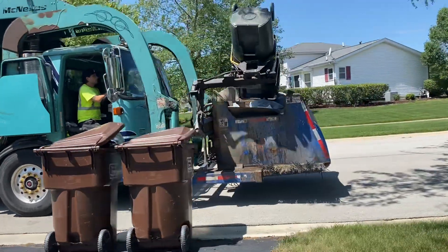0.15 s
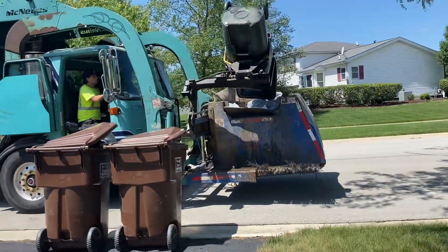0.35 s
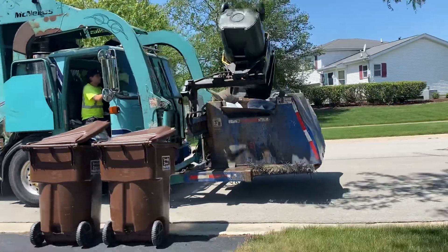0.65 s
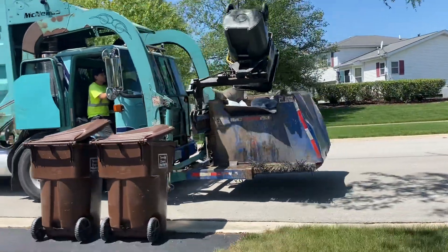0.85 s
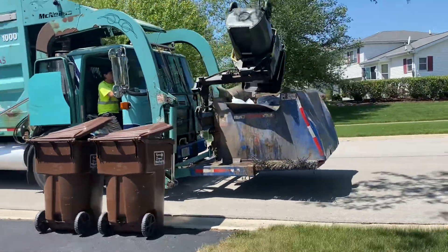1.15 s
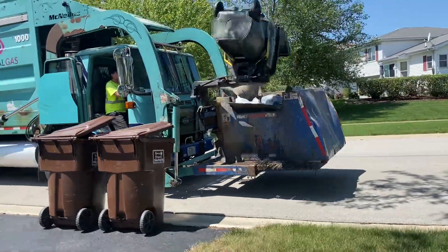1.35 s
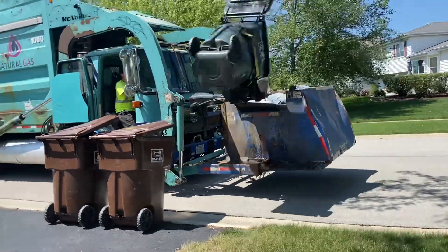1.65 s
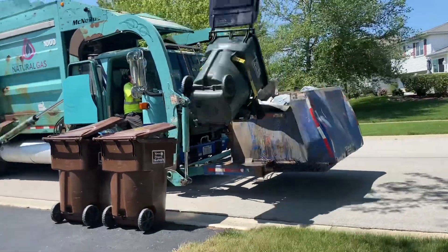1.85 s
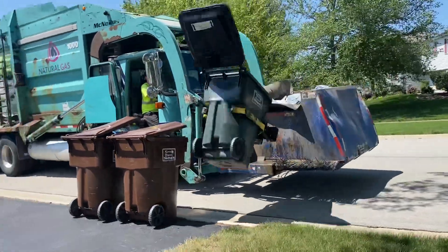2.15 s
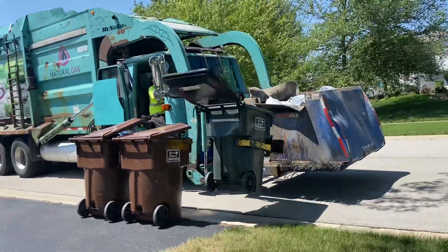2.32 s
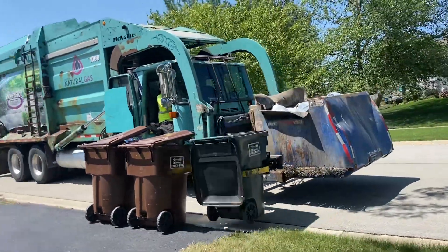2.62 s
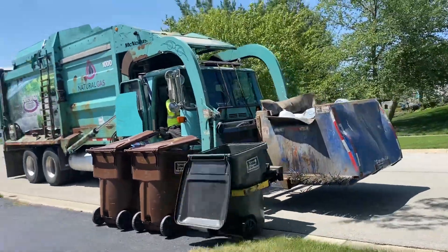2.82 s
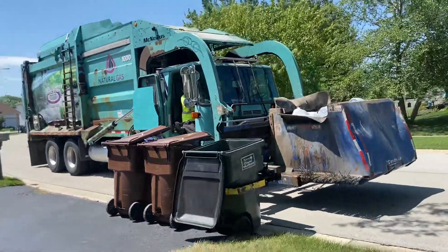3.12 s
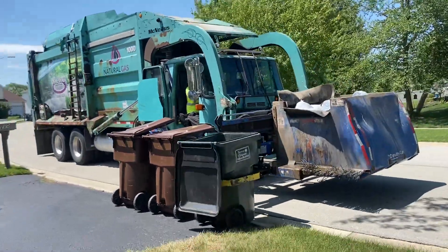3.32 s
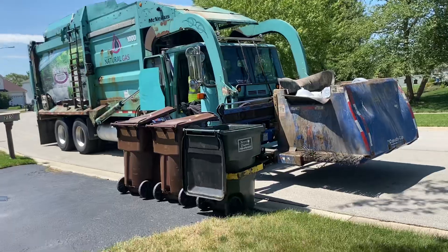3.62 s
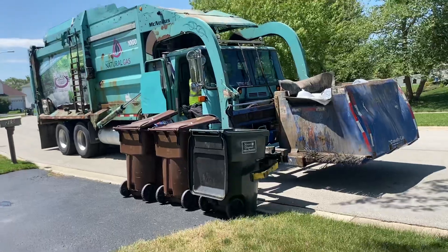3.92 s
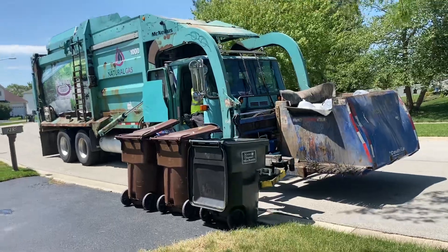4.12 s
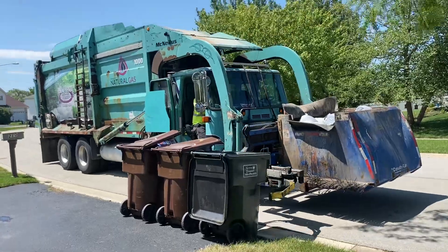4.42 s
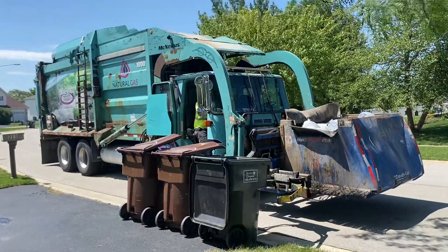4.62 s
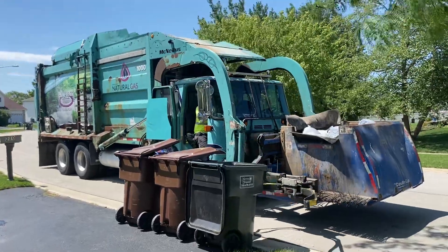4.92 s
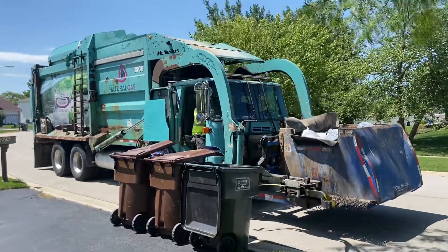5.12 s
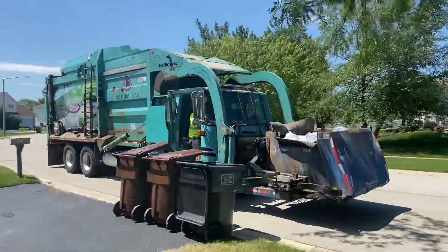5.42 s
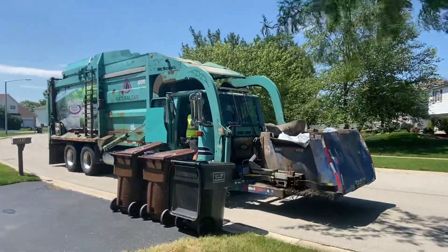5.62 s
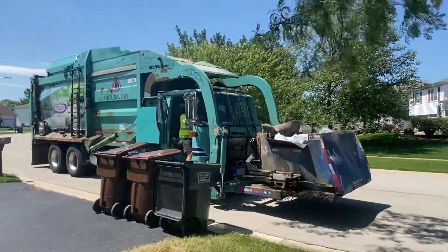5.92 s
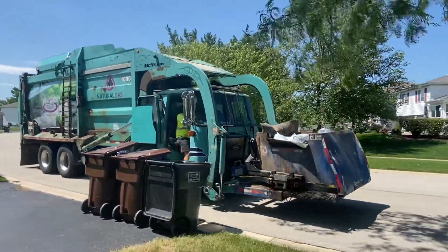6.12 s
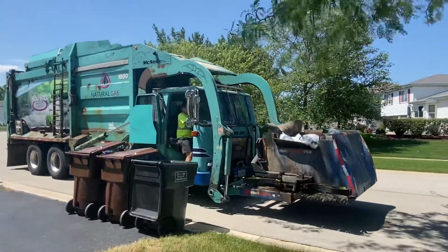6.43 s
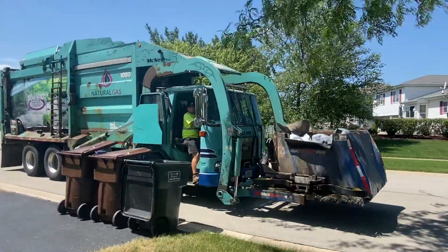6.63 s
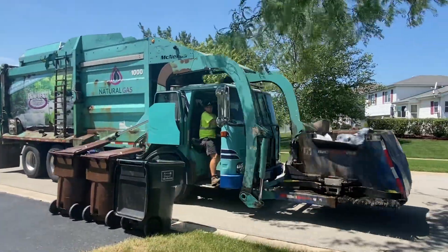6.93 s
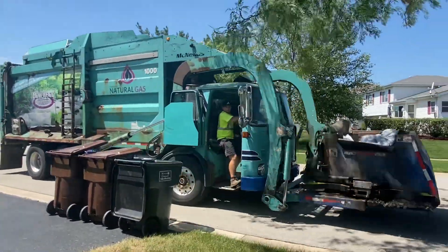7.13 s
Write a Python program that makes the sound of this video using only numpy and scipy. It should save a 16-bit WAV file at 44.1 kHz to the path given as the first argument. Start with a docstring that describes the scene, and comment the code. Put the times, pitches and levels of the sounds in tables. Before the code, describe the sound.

Outdoors, near the kerb, a microphone catches a large truck's uneven, rumbling idle. Isolated hard bangs of a plastic bin are followed by a dense run of lid slaps, thuds, metal ticks and hopper booms as it is emptied and put down. Low wind buffets follow, with a short air bleed and small hydraulic whine. Metal clanks, then the six-cylinder engine climbs in pitch and loudness, hissing and whistling as the truck pulls off.

```python
"""A plastic cart bangs over the idle of a refuse truck, whose arm shakes it out over a steel hopper.
Blows are noise bursts with damped modes, booms are low modes, and house fronts return diffuse echoes.
The arm sets the cart down and folds away while wind buffets the microphone in short low throbs.
The brake clanks off; the six-cylinder engine, tones and noise in step with its firings, revs up,
its turbocharger whistling as a gliding sine."""
import sys
import numpy as np
from scipy import signal
from scipy.fft import rfft, irfft, next_fast_len
from scipy.io import wavfile
from scipy.ndimage import map_coordinates

SR = 44100
rng = np.random.default_rng(int(sys.argv[2]) if len(sys.argv) > 2 else 0)


def bounce(signal):
    """Save signal as a 16-bit WAV file at the path given by the first command-line argument."""
    frames = np.transpose(np.atleast_2d(signal))
    limited = np.clip(frames, -1, 1)
    pcm = np.round(limited * 32767).astype(np.int16)
    wavfile.write(sys.argv[1], SR, pcm)


N = 320155
IDLE_RATE = 40  # reference speed, firings per s

# colour of loose metallic clatter: f/Hz, relative density/dB
CLATTER_COLOUR = [(1100, -38), (1500, 2), (2200, 1), (3000, -2), (4200, -8), (5000, -12), (5700, -7.5),
                  (8000, -16)]
# stereo image: t/s, share out of phase, share wide
IMAGE_SHARES = [(4.89, 0.03, 0.03), (4.91, 0.99, 0.01), (5.03, 0.86, 0.033), (5.2, 0.73, 0.22),
                (5.6, 0.22, 0.9), (6, 0.018, 0.87)]


def amp(db):
    """Level in decibels to amplitude ratio."""
    return 10 ** (np.asarray(db) / 20)


def unit(x):
    """Normalization to a root mean square of 1."""
    return x / np.sqrt(np.mean(x ** 2) + 1e-20)


def along(points, hz):
    """Interpolation of (f/Hz, value) points on a logarithmic frequency axis."""
    f, v = np.transpose(points)
    return np.interp(np.log(hz + 1), np.log(f + 1), v)


def curves(rows):
    """Linear interpolation in time: one value per sample for each column after t/s."""
    s, *cols = np.transpose(rows)
    return [np.interp(np.arange(N) / SR, s, c) for c in cols]


def wobble(rate):
    """Slow random modulation: a smooth curve through `rate` random knots per second."""
    knots = rng.standard_normal(int(N * rate / SR) + 4)
    return map_coordinates(knots, [np.arange(N) * rate / SR])


def filtered(x, response):
    """Linear filtering: the spectrum of x times a response of frequency."""
    m = next_fast_len(x.shape[-1] + 8192)
    return irfft(rfft(x, m) * response(np.fft.rfftfreq(m, 1 / SR)), m)[..., :x.shape[-1]]


def noise(spectrum, gate=1):
    """Coloured noise of rms 1, amplitude-modulated by the gate before filtering."""
    return unit(filtered(gate * rng.standard_normal(N), lambda hz: amp(along(spectrum, hz))))


def add(track, s, sound):
    """Superposition of a sound on the track from time s."""
    part = track[round(s * SR):][:len(sound)]
    part += sound[:len(part)]


def decay(t, t60):
    """Exponential damping: 60 dB lost in t60 seconds."""
    return amp(-60 * t / t60)


def onset(t, rise_s):
    """Exponential build-up with time constant rise_s."""
    return 1 - np.exp(-t / rise_s)


def lowpass(x, corner_hz):
    """Zero-phase second-order low-pass, halving the amplitude at the corner."""
    return filtered(x, lambda hz: 1 / (1 + (hz / corner_hz) ** 2))


def ring(modes, t, attack, scatter_db=4.0, detune=0):
    """Modal synthesis: damped sines at random strengths, detuned at random if asked."""
    tones = 0
    for hz, db, t60 in modes:
        strength = amp(db + rng.normal(0, scatter_db) - 60 * t / t60)
        tones = tones + strength * np.sin(2 * np.pi * hz * (1 + detune * rng.normal()) * t)
    return tones * onset(t, attack)


def wind():
    """Turbulent pressure: low throbs alike at both ports, rougher noise opposite in sign."""
    # buffets: t/s, level/dB, f/Hz
    buffets = [(3.811, -11.5, 95.5), (3.859, -19, 103.5), (3.917, -11, 59.4), (4.021, -13.5, 77.4),
               (4.09, -13, 74), (4.208, -11.5, 72.4), (4.344, -20, 84.6), (4.47, -14, 77.7),
               (4.545, -16.5, 98.3), (4.622, -19.5, 68.5), (4.988, -20, 95)]
    # rough wind noise: t/s, level/dB
    gust = [(3.3, -73), (3.6, -45), (4.0, -34), (4.2, -20.5), (4.35, -37), (4.6, -26), (4.8, -37.5),
            (5.15, -37), (5.6, -59)]
    swell_s = 0.016  # a buffet's envelope peaks after this long
    throbs, t = np.zeros(N), np.arange(SR // 5) / SR
    swell = t / swell_s * np.exp(1 - t / swell_s)
    for s, db, hz in buffets:
        throb = np.sin(2 * np.pi * hz * t + rng.uniform(0, 2 * np.pi))
        add(throbs, s - .008, amp(db) * swell * throb)
    gust_level = amp(curves(gust)[0] + 0.56 * wobble(22.3))
    rough = gust_level * noise([(40, 10), (150, 13), (400, -5.5), (900, -13.0), (2000, -69)])
    return np.array([throbs + rough, throbs - rough])


def houses(x):
    """Diffuse reverberation: a delayed noise tail in which each frequency decays at its own rate."""
    # reverberation time of the street: f/Hz, t60/s
    street_t60 = [(200, 0.56), (2000, 0.18), (10000, 0.38)]
    hz, t, z = signal.stft(rng.standard_normal(SR // 2), SR, nperseg=256)
    tail = signal.istft(z * decay(t, along(street_t60, hz)[:, None]), SR, nperseg=256)[1]
    delayed = np.pad(x, (1500, 0))  # samples
    return signal.fftconvolve(delayed, tail / np.linalg.norm(tail))[:N]


def firing_tones(rate, low_end_db, count):
    """Harmonics of the firing rate: pipe resonance shapes the 1st and 3rd, the 2nd fades with speed."""
    # exhaust pipe, for the 1st and 3rd multiple where they fall: f/Hz, level/dB before low-end strength
    pipe = [(40, -39.5), (53, -48), (60, -24.5), (66, -29), (75, -14.5), (84, -19.5), (88, -21), (92, -39),
            (120, -34.5), (158, -34.5), (170, -21), (198, -27), (212, -17.5), (223, -18.5), (232, -31.5),
            (240, -18.5), (252, -14), (263, -20), (272, -26)]
    # half-multiples from uneven cylinders: multiple of firing rate, level/dB re rms of the 1st
    between = [(3 / 2, -12.5), (5 / 2, -8.5)]
    first_db = along(pipe, rate) + low_end_db
    second_db = -29.5 - 9 * np.log2(rate / IDLE_RATE) + low_end_db  # 9 dB lost as the speed doubles
    third_db = along(pipe, 3 * rate) + low_end_db
    tones = 0
    for multiple, db in enumerate([first_db, second_db, third_db], 1):
        level = np.sqrt(2) * amp(db + 1.05 * wobble(11))
        tones = tones + level * np.sin(2 * np.pi * multiple * count + 0.31 * wobble(8.6))
    for multiple, db in between:
        tones += amp(first_db + db + 2.0 * wobble(9)) * np.sin(2 * np.pi * multiple * count)
    return tones


def crank_knock(rate, clatter_db, count):
    """Impact noise: one burst per crank turn, sinking under the clatter as the speed starts to rise."""
    # colour of the knock: f/Hz, relative density/dB
    knock_colour = [(700, -36), (1200, 7), (1600, 22), (2500, 14.5), (3500, -22), (5000, -24)]
    turn = count / 3  # three firings per crank turn
    phase = turn % 1
    strength = amp(rng.normal(0, 1.8, 400)[turn.astype(int)])
    beat = strength * np.exp(-4 * phase) * onset(phase, 1 / 12)
    under_clatter_db = 2.5 + np.clip(rate - 41, 0, 12)
    return amp(clatter_db - under_clatter_db) * noise(knock_colour, beat)


def firing_noise(rate, low_end_db, count):
    """Amplitude-modulated noise: four bands puff at every firing with its cylinder's strength."""
    # strength of each firing in the cycle: level/dB
    cylinders = [-5, -6.5, -6, -4, -8, -4]
    # colours of exhaust rumble, engine block and hiss: f/Hz, relative density/dB
    rumble_colour = [(20, -30), (38, -13.5), (58, 4), (85, 0), (130, 1), (200, -3), (300, -14), (450, -54)]
    block_colour = [(150, -27), (220, 1), (300, 0.5), (450, -5), (700, -8), (1000, -11), (1400, -18),
                    (2000, -73)]
    hiss_colour = [(4500, 10.5), (6000, 13.5), (8500, 11.5), (11000, -2.5), (15000, -5), (17000, -36)]
    # hiss: t/s, level/dB
    hiss_level = [(0, -55), (0.7, -53.5), (1.7, -51.5), (2.9, -39.5), (4.9, -36.5), (5.6, -34), (6.7, -32),
                  (7.26, -31.5)]
    # treble dips briefly, then stays a little lower: t/s, gain/dB
    lull = [(2.69, 0), (2.715, -18), (2.755, -7), (2.765, -4)]
    octaves = np.log2(rate / IDLE_RATE)
    uneven = np.clip(1 - 0.74 * octaves, 0, 1)  # the firings even out with speed
    firing = count.astype(int)
    strength_db = np.array(cylinders)[firing % len(cylinders)]
    strength_db = strength_db + 3.46 * uneven * rng.standard_normal(1000)[firing]

    def level(idle_db, rise_db, share):
        """Level law: rise_db per doubling of speed plus a share of the low-end strength in dB."""
        return idle_db + rise_db * octaves + share * low_end_db

    def puff(floor, fall):
        """Pulse envelope: decays by exp(-fall) over each firing above a steady floor."""
        return floor + amp(strength_db) * np.exp(-fall * (count % 1))

    rumble_db = level(idle_db=-28.5, rise_db=7.9, share=2.12)
    block_db = level(idle_db=-34.5, rise_db=16.17, share=0.86)
    clatter_db = level(idle_db=-48.5, rise_db=23.6, share=0.3)
    rumble = amp(rumble_db + wobble(9)) * noise(rumble_colour, puff(floor=.7, fall=1.5))
    block = amp(block_db + 2.07 * uneven * wobble(11)) * noise(block_colour, puff(floor=0.98, fall=0.28))
    clatter_level = amp(clatter_db + 0.35 * uneven * wobble(5.7))
    clatter = clatter_level * noise(CLATTER_COLOUR, puff(floor=1.0, fall=0.13))
    clatter += crank_knock(rate, clatter_db, count)
    hiss_gain = amp(curves(hiss_level)[0] + 1.64 * wobble(3.09))
    hiss = hiss_gain * noise(hiss_colour, puff(floor=0.76, fall=1.2))
    return rumble + block + amp(curves(lull)[0]) * (clatter + hiss)


def turbocharger():
    """Frequency modulation: a whistle glides upward, its pitch and level fluctuating."""
    # whistle before fluctuation: t/s, f/Hz, level/dB
    whistle = [(6.25, 8800, -75), (6.45, 9500, -52), (6.8, 10920, -48), (7, 11550, -46), (7.26, 12200, -45)]
    hz, db = curves(whistle)
    level = amp(db + 2.5 * wobble(25))
    return level * np.sin(2 * np.pi * np.cumsum(hz + 35 * wobble(100)) / SR)


def pump():
    """Frequency modulation: an unsteady whine swells as the arm folds home."""
    # whine before fluctuation: t/s, f/Hz, level/dB
    whine = [(4.68, 780, -62), (4.82, 855, -45), (5.02, 825, -44), (5.12, 830, -62)]
    hz, db = curves(whine)
    level = amp(db + 2 * wobble(25.08))
    return level * np.sin(2 * np.pi * np.cumsum(hz + 10 * wobble(25)) / SR)


def engine():
    """Periodic excitation: tones and noise share one firing count, the integral of the firing rate."""
    # engine speed: t/s, firing rate/Hz
    speed = [(0, 40.15), (2.4, 40.1), (3.6, 39.8), (4.2, 38.5), (4.75, 39.6), (5.05, 43), (5.32, 52.9),
             (5.48, 55.9), (5.85, 61.5), (6.08, 66.5), (6.25, 71.4), (6.44, 74.8), (6.95, 84.2),
             (7.26, 90.5)]
    # low-end strength of the truck's sound: t/s, level/dB
    low_end = [(0, 3.5), (0.12, 0), (0.55, -0.5), (0.9, -1), (1.7, -1.5), (2.45, 0.5), (3.15, 1.5),
               (3.5, 2), (3.8, 2.5), (4.1, 1.5), (4.75, 0), (4.9, -4.5), (5.07, -5.5), (5.3, -0.5),
               (5.6, 1.5), (6.08, -1), (6.44, 1), (6.95, 1), (7.26, 1.5)]
    (rate,), (low_end_db,) = curves(speed), curves(low_end)
    count = .75 + np.cumsum(rate) / SR  # firings so far
    tones = firing_tones(rate, low_end_db, count)
    return tones + firing_noise(rate, low_end_db, count) + turbocharger() + pump()


def brake():
    """Forced resonance: chatter drives steel modes, which damp as the parts seat with a loose rattle."""
    # modes of the steel parts: f/Hz, level/dB, t60/s
    brake_modes = [(970, -0.5, 0.049), (2080, -6, 0.035), (2187, -10, 0.18), (2800, -10, 0.025),
                   (4220, -16, 0.025), (5270, -7, 0.038)]
    # clanks: t/s, relative level/dB, chatter/s
    clanks = [(5.158, -12, 0.0305), (5.481, -19, 0.01)]
    out, t = np.zeros(N), np.arange(SR // 3) / SR
    for s, db, chatter in clanks:
        shakes = rng.standard_normal(len(t)) + 0.2 * np.sin(2 * np.pi * brake_modes[0][0] * t)
        shakes = shakes * (t < chatter) * np.minimum(t / 0.0035, 1)
        struck = ring(brake_modes, t, attack=0.00034, scatter_db=1.0)
        squeak = signal.fftconvolve(shakes, struck)[:len(t)]
        squeak *= amp(-9 * np.clip((t - chatter) / 0.003, 0, 1))  # the seated parts damp each other
        # the clatter colour moved up in frequency by 1.7
        loose = filtered(rng.standard_normal(len(t)), lambda hz: amp(along(CLATTER_COLOUR, hz / 1.7)))
        fade = amp(-60 * np.clip(t - chatter, 0, 1) / 0.41 - 2.5 * (t > chatter))
        rattle = fade * unit(loose) * np.minimum(t / 0.008, 1)
        add(out, s, amp(db) * (squeak / np.abs(squeak).max() * 2.1 + .16 * rattle))
    return out


def cart_blows():
    """Impact: a noise crack, a slower thud and cart modes; weaker blows start more slowly."""
    # blows of cart, lid and arm: t/s, relative level/dB, brightness/(dB per octave, roughly),
    # gain of higher cart modes/(dB per octave)
    blows = [(0.005, -14.5, -1.5, -2), (0.128, -26, -3.5, 4), (0.371, -11.5, -0.5, 3),
             (0.411, -13, -2.5, -11), (0.43, -24, 2, -6), (1.019, -26, 7, -6), (1.027, -8, -1.5, -6),
             (2.281, -19, -5.5, 5), (2.306, -18.5, -7, 3), (2.334, -17, -7.5, 7), (2.64, -6, -3.5, 4),
             (2.657, -26, 6.5, 9), (2.68, -23, -10, 2), (2.767, -11.5, -8, 6.5), (2.827, -14.5, -4.5, 8),
             (2.873, -19, -2.5, 6), (2.982, -20.5, -3.5, 0), (3.264, -8, 1, 0), (3.278, -6.5, -2, -4),
             (3.309, -12, 1, 1), (3.335, -14.5, -3, -7), (3.374, -10.5, -2.5, 3), (3.403, -11.5, -4.5, -2),
             (3.495, -22, -6, 8), (3.572, -16.5, -5, 0), (3.662, -19, -2, 4), (4.091, -22, -5, -6),
             (4.165, -23.5, 3, -4), (4.887, -21, -11, 1), (5.484, -11.5, -0.5, 11), (5.707, -7.5, 1.5, 0),
             (5.73, -10, -8, -2), (5.957, -15, -36, -5)]
    # colour of a blow before brightness: f/Hz, relative density/dB
    bang_colour = [(200, 3), (300, 0), (450, 0), (700, -4), (1000, -6), (1400, -10.5), (2200, -14.5),
                   (3000, -19.5), (4200, -23), (5800, -22.5), (8000, -26), (11000, -38.5), (15000, -48)]
    # cart modes before tilt and the common damping: f/Hz, level/dB, t60/s
    cart_modes = [(344.5, 4.5, 0.18), (532.4, 3.5, 0.17), (691, 3.5, 0.073), (813, -20, 0.037),
                  (1252, -1.5, 0.081)]
    out, t = np.zeros(N), np.arange(SR // 3) / SR
    for s, db, bright_db, tilt_db in blows:
        def colour(hz):
            """Spectral tilt of the bang, cut below 180 Hz."""
            return amp(along(bang_colour, hz) + bright_db * np.log2(hz / 1000 + 0.89)) * (hz > 180)

        soft = amp(-0.45 * db)  # attack lengthens as the level falls
        burst = unit(filtered(rng.standard_normal(len(t)), colour))
        low = lowpass(burst, 1200)
        crack = (burst - low) * decay(t, t60=0.13) * onset(t, 0.0011 * soft)
        thud = low * onset(t, 0.014) * decay(t, t60=0.17)
        struck = [(hz, level + tilt_db * np.log2(hz / 500), t60) for hz, level, t60 in cart_modes]
        modes = ring(struck, t, attack=0.0042 * soft, detune=0.08) * decay(t, t60=0.14)
        add(out, s - .004, amp(db) * (crack + 1.02 * thud + 0.4 * modes))
    return out


def joint_ticks():
    """Impact of stiff bodies: short steel modes with a click of low-passed noise."""
    # ticks in the arm's joints: t/s, relative level/dB, brightness/dB (per octave for the modes)
    ticks = [(0.362, -20, 4), (0.366, -2, -6.5), (0.377, -9, -9), (0.387, -14, -7), (1.0301, -19, 7),
             (1.041, -24, 6), (2.323, -24, -1), (2.398, -22, -1), (2.638, -14.5, 4), (2.766, -31, 3.5),
             (2.823, -31, 9), (3.2588, -12.5, 6.5), (3.278, -8, -5), (3.3014, -16, -5.5), (3.4286, -27, 1),
             (3.7609, -24, -14), (3.843, -18, -8), (3.853, -29, 10), (3.896, -37, 18), (5.483, -28, 13)]
    # steel modes before brightness: f/Hz, level/dB, t60/s
    steel_modes = [(2250, -3, .02), (1900, -8, .02), (2700, -3, .022), (3260, -2, .022), (4250, -9, .015),
                   (5250, -5, .016), (5900, -8, .014), (6500, -9, .014)]
    out, t = np.zeros(N), np.arange(SR // 3) / SR
    for s, db, bright_db in ticks:
        struck = [(hz, level + bright_db * np.log2(hz / 2250), t60) for hz, level, t60 in steel_modes]
        click = amp(bright_db - 60 * t / 0.023) * lowpass(rng.standard_normal(len(t)), 8000)
        click = click * onset(t, 0.0038)
        modes = ring(struck, t, attack=0.0017, scatter_db=2.4, detune=0.02)
        add(out, s - .002, amp(db) * (modes + 0.84 * click))
    return out


def hopper_booms():
    """Low resonance: a damped mode with a weaker, shorter overtone."""
    # booms: t/s, relative level/dB, f/Hz, t60/s
    booms = [(0.431, -3.5, 82, 0.14), (1.063, -9, 94.5, 0.24), (2.312, -13, 101.2, 0.44),
             (2.645, -0.5, 87.6, 0.2), (2.816, -6.5, 83, 0.43), (2.999, -9.5, 79, 0.41),
             (3.286, -0.5, 89, 0.22), (5.705, 2.5, 181.2, 0.17)]
    out, t = np.zeros(N), np.arange(SR // 3) / SR
    for s, db, hz, t60 in booms:
        modes = [(hz, 0, t60), (2.5 * hz, -12, t60 / 2)]
        add(out, s - .006, amp(db) * ring(modes, t, attack=0.015, scatter_db=1.2))
    return out


def pitched_knocks():
    """Damped resonance: two modes give the pitched part of some blows and one high steel tick."""
    # pitched parts: t/s, relative level/dB, f/Hz, t60/s
    knocks = [(0.374, -8, 418, 0.059), (0.389, -16, 527, 0.054), (1.033, -7, 343, 0.091),
              (1.035, -20, 530, 0.062), (2.268, -14.5, 302, 0.042), (2.638, -14.5, 1820, 0.027),
              (2.64, 4, 710, 0.02), (2.776, -20, 490, .04), (3.266, -5, 563, 0.054),
              (3.281, -2, 503, 0.032), (3.384, -8.5, 300, 0.044)]
    out, t = np.zeros(N), np.arange(SR // 3) / SR
    for s, db, hz, t60 in knocks:
        modes = [(hz, 0, t60), (1.43 * hz, -5, t60)]
        add(out, s - .002, amp(db) * ring(modes, t, attack=0.002, scatter_db=3.5))
    return out


def air_valve():
    """Jet noise: a valve bleeds air as a short, fluctuating hiss."""
    # bleed: t/s, level/dB
    bleed = [(3.96, -75), (3.985, -38), (4.03, -38.5), (4.17, -47), (4.22, -75)]
    air = noise([(3000, -25), (4600, 0), (6500, 0), (10500, -4), (14000, -12)])
    return amp(curves(bleed)[0] + 1.7 * wobble(40)) * air


def arm():
    """Superposition of the blows, ticks, booms, pitched knocks and air of the arm at work."""
    return cart_blows() + joint_ticks() + hopper_booms() + pitched_knocks() + air_valve()


def scene():
    """Partial coherence: both ports share truck, arm and street, plus a part opposite in sign."""
    # unlike part of left and right: f/Hz, level/dB in the narrow image, level/dB in the wide image
    unlike = [(60, -51, -53), (150, -56, -45), (312, -20.5, -51), (564, -24, -13.5), (730, -14, 1.5),
              (1760, -26, -9), (2620, -1.5, -0.5), (5000, -21, 1), (6000, -48, -38), (15000, -42, -33)]
    blows = arm() + brake()
    truck = engine() + blows + amp(-15.0) * houses(blows)
    z = signal.stft(truck, nperseg=256)[2]
    random_phase = np.exp(2j * np.pi * rng.random(z.shape))
    scattered = signal.istft(z * random_phase, nperseg=256)[1][:N]  # same colour, other phases
    unlike_hz, *unlike_db = np.transpose(unlike)
    narrow, wide = [filtered(scattered, lambda hz: amp(along(np.c_[unlike_hz, db], hz)))
                    for db in unlike_db]
    widening = np.clip(curves(IMAGE_SHARES)[1], 0, 1)
    apart = (1 - widening) * narrow + widening * wide
    return np.array([truck + apart, truck - apart]) + wind()


def record(dry):
    """Interchannel phase: the sides turn against each other, then soft limiting and a band limit."""
    # phase by which left leads: f/Hz, narrow/rad, out of phase in the low middle/rad, wide/rad
    phase_leads = [(100, 0, 0, 0), (180, 0, .6, .1), (270, -.05, 3, .2), (440, -.05, 3.1, 1.1),
                   (555, .05, 3.1, 3.1), (650, 0, 3.1, 1.7), (780, -.05, 3.1, 1.3), (860, -.05, 1.2, .7),
                   (950, -.1, 3, 0), (1050, -.15, 2.5, -.6), (1300, -.05, 2.6, -.1), (1600, 0, 2, .3),
                   (2000, 0, 0, 0), (2700, .6, -.2, -1), (3100, .5, 1.4, 2.2), (4400, .7, .9, 1),
                   (5000, .1, .1, .1)]
    # level of left over right in the wide image: f/Hz, level/dB
    left_over_right = [(160, 0), (260, 4), (420, 2.5), (600, -4), (930, 6), (1300, -1.5), (1800, 3),
                       (3000, -4), (5500, 0)]
    treble_lag_s, band_limit_hz = 0.00016, 15900
    lead_hz, *leads = np.transpose(phase_leads)

    def treble(hz):
        """Phase of a right-side lag above 5 kHz, with a ripple on the ramp."""
        ramp = 2 * np.pi * treble_lag_s * np.clip(hz - 4400, 0, None) * (hz > 5000)
        return ramp - 0.32 * np.sin(2 * ramp)

    def turned(lead):
        """All-pass filtering: half the lead on each side, opposite in sign."""
        def response(hz):
            """Unit-magnitude response of the two sides."""
            phase = along(np.c_[lead_hz, lead], hz) + treble(hz)
            return np.exp(.5j * np.outer([1, -1], phase))
        return filtered(dry, response)

    narrow, opposed, wide = map(turned, leads)
    wide = filtered(wide, lambda hz: amp(np.outer([.5, -.5], along(left_over_right, hz))))
    opposed_share, wide_share = np.clip(curves(IMAGE_SHARES), 0, 1)
    x = (1 - opposed_share - wide_share) * narrow + opposed_share * opposed + wide_share * wide
    x = x / (1 + np.abs(x / .97) ** 8) ** (1 / 8)  # soft limit
    return filtered(x, lambda hz: hz < band_limit_hz)


dry = scene()
out = record(dry)
bounce(out)
```